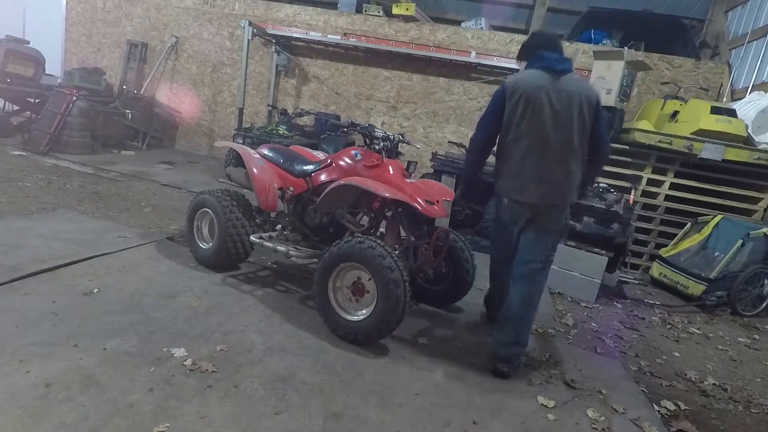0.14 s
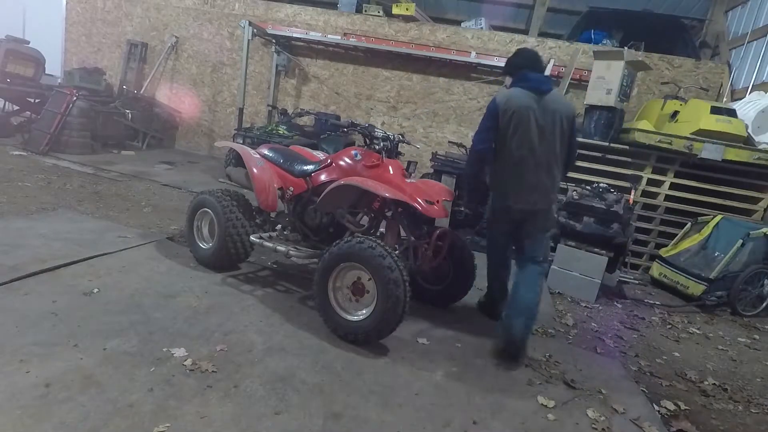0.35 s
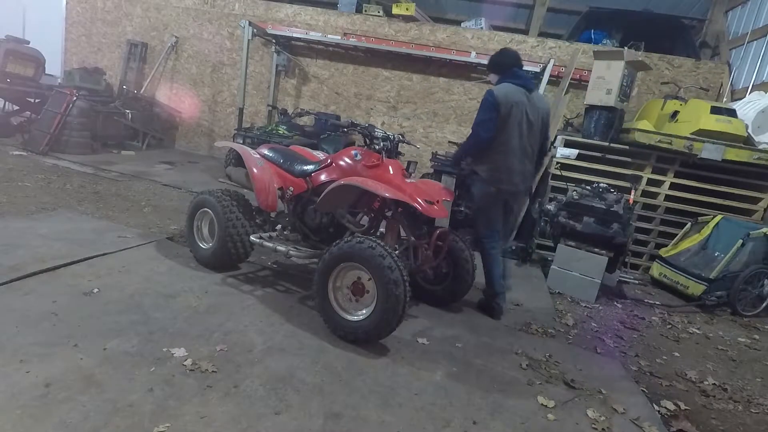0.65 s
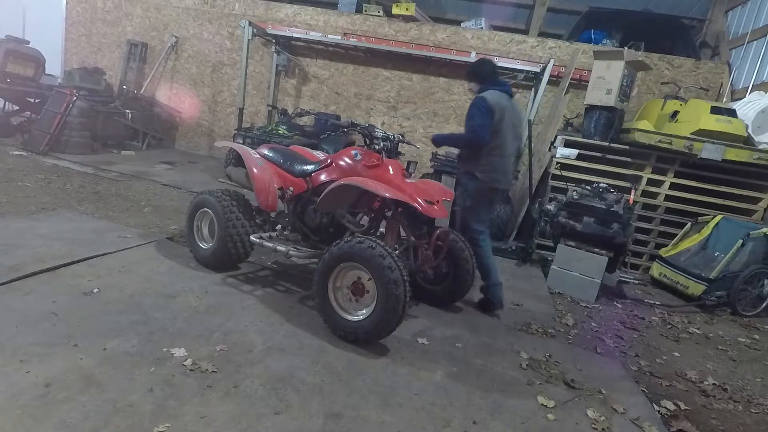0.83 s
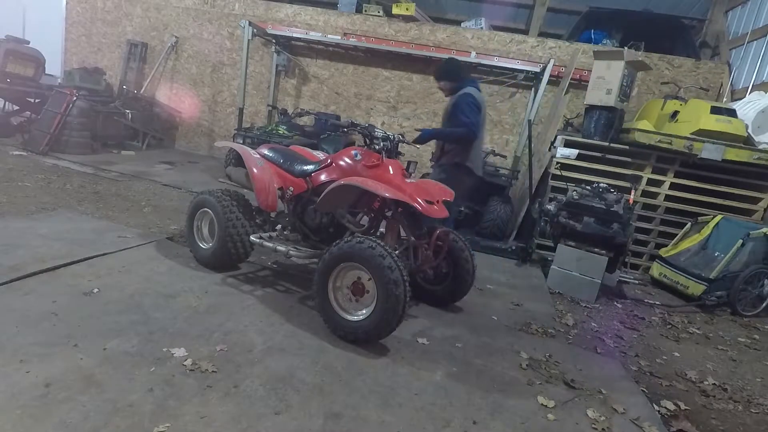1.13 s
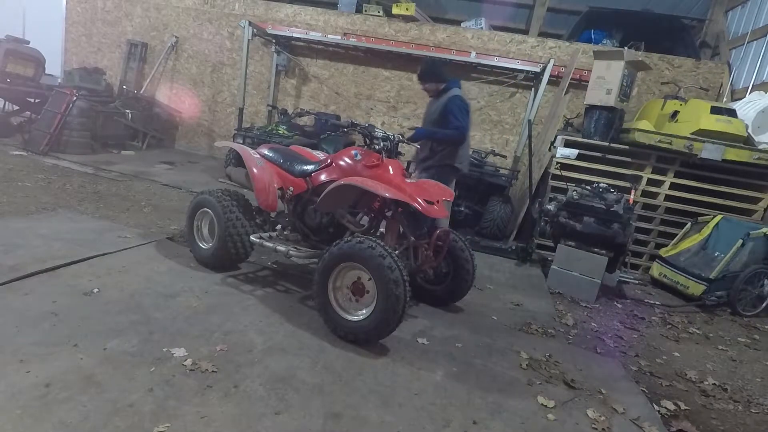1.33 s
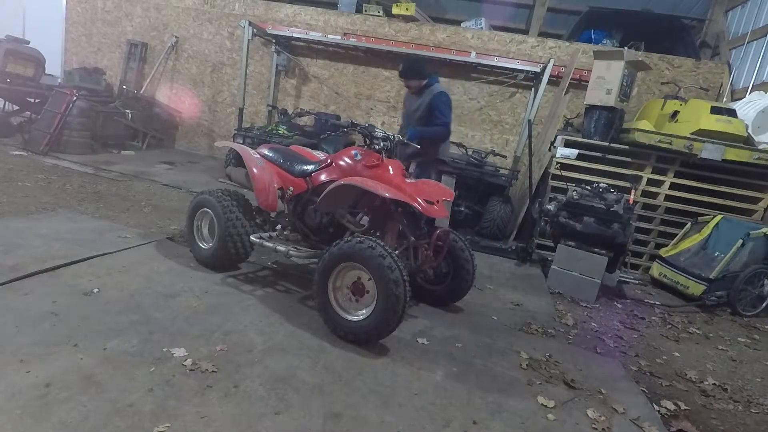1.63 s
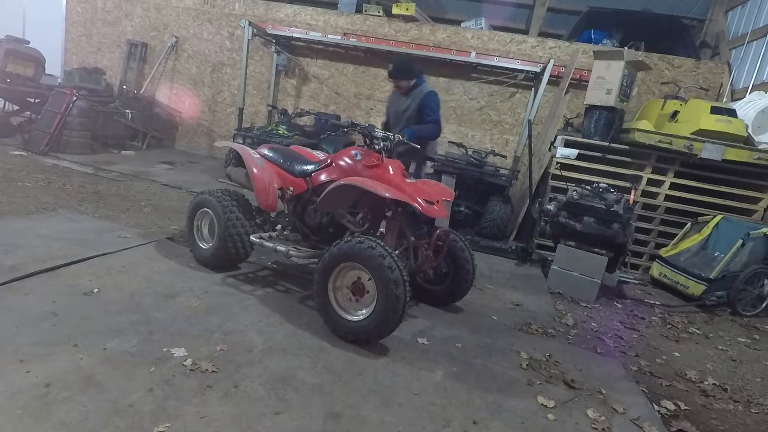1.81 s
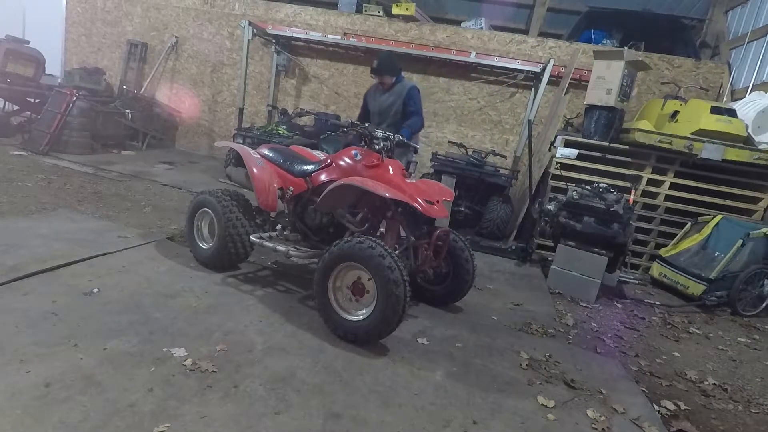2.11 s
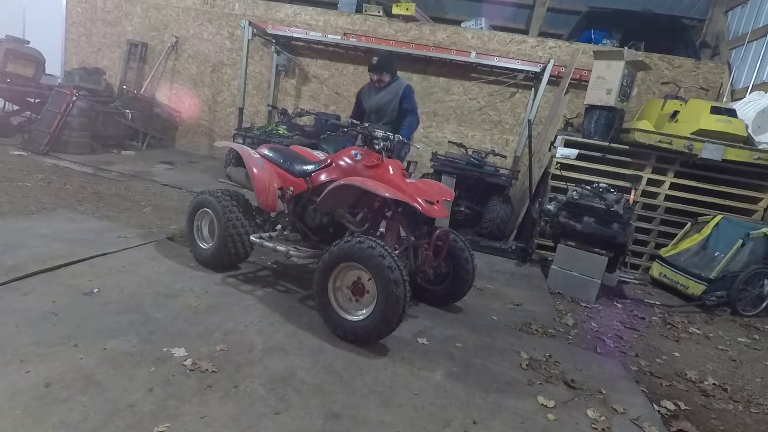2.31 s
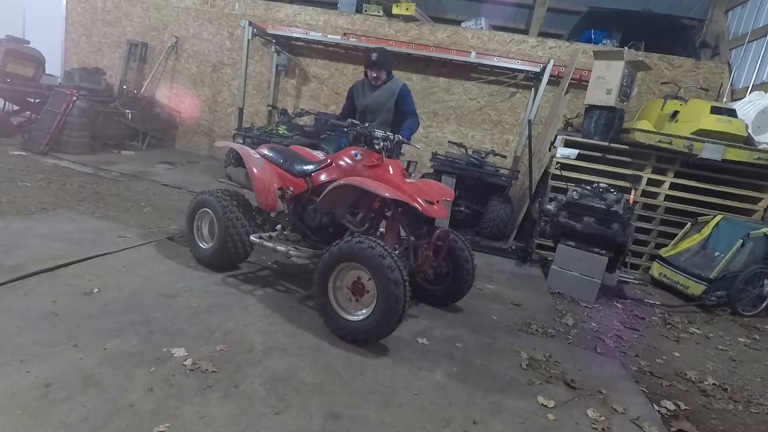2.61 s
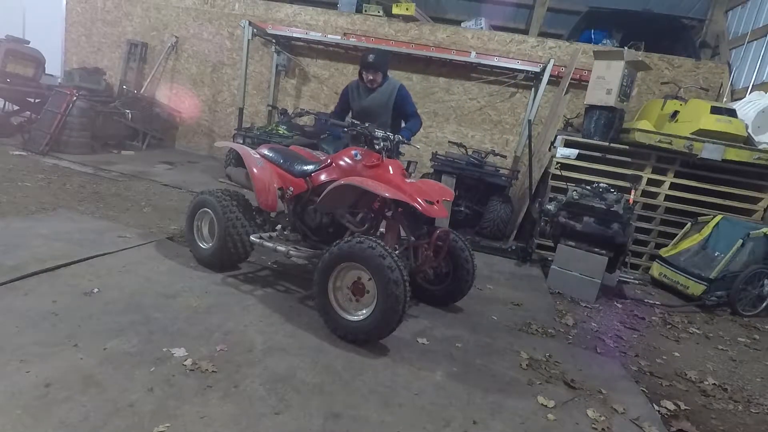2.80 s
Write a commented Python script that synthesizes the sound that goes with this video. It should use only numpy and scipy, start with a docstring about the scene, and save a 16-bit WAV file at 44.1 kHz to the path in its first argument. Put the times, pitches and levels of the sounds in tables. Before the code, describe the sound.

Footsteps: soft rubber boots on gritty concrete in a large echoing shed. Thuds and scuffs at 0.1-0.3 s, with a sharp grit crackle near 0.33; a faint step at 0.55, a firm one at 0.81-0.87, softer ones at 1.25 and 1.77. Light plastic taps at 2.13-2.19, a faint thud at 2.4, then louder hollow knocks at 2.59-2.68, ringing away over faint hiss and rumble.

```python
"""In a large echoing shed, rubber-soled boots cross a concrete workshop floor: soft heel and toe thuds.
The soles scuff and crack grit, made of shaped noise; hands knock the plastic body of a small vehicle,
made of ringing tones. Thuds are short sagging tones with a dull slap of noise. The shed answers with
wall echoes, standing waves and a fading tail. Faint air hiss and low rumble lie underneath."""
import sys
import numpy as np
from scipy import signal
from scipy.fft import rfft, irfft, next_fast_len
from scipy.io import wavfile
from scipy.ndimage import map_coordinates

SR = 44100
rng = np.random.default_rng(int(sys.argv[2]) if len(sys.argv) > 2 else 0)


def gain_from_db(level_db):
    """Convert decibel levels to linear amplitude factors (20 dB per decade)."""
    decades = np.asarray(level_db, float) / 20
    return 10 ** decades


def waveform_to_disk(signal):
    """Save audio, clipped to [-1, 1], as 16-bit WAV at the path in sys.argv[1]."""
    frames = np.transpose(np.atleast_2d(signal))
    scaled = np.clip(frames, -1, 1) * 32767
    samples = np.round(scaled).astype(np.int16)
    wavfile.write(sys.argv[1], SR, samples)


N = 130095  # length in samples


def along(points, hz):
    """Read a curve of (pitch_hz, value) points, with pitch on a log axis."""
    point_hz, value = np.transpose(points)
    return np.interp(np.log(hz + 1), np.log(point_hz + 1), value)


def unit(x):
    """Scale to an rms of 1."""
    return x / np.sqrt(np.mean(x ** 2) + 1e-20)


def coloured(x, gain_db):
    """Make some pitches louder and others softer; gain_db is a function of frequency in Hz."""
    size = next_fast_len(len(x) + 8192)
    gain = gain_from_db(gain_db(np.fft.rfftfreq(size, 1 / SR)))
    return irfft(rfft(x, size) * gain, size)[:len(x)]


def add(out, start_s, x):
    """Mix x into out from start_s on, trimming whatever lies outside."""
    start = round(start_s * SR)
    x = x[max(-start, 0):]
    part = out[max(start, 0):][:len(x)]
    part += x[:len(part)]


# Tone of the air hiss: pitch_hz, relative level_db
AIR_TONE = [(41, -47), (70, 4), (655, -6), (899, -4), (1290, -13), (1480, -7.5), (2030, -16),
            (15500, -22.5)]
# Tone of the low rumble: pitch_hz, relative level_db
RUMBLE_TONE = [(7.1, -61), (12, 9.5), (25, 13), (54, -5.5), (110, -17), (140, 1), (240, -120)]
# Rise and fall of the rumble: time_s, level_db
RUMBLE_LEVEL = [(0.0, -48.5), (0.73, -46.5), (0.77, -52), (0.87, -47), (0.92, -60), (1.08, -47),
                (1.21, -59), (1.27, -46.5), (1.71, -54.5), (1.81, -45), (2.0, -58), (2.05, -48),
                (2.59, -52), (2.64, -40), (2.89, -60), (2.95, -53)]


def background():
    """Steady hiss of the air and a low rumble, both coloured noise; the rumble sways at random."""
    t = np.arange(N) / SR
    air = unit(coloured(rng.standard_normal(N), lambda hz: along(AIR_TONE, hz)))
    sway_db = 1.5 * map_coordinates(rng.standard_normal(40), [t * 8])  # 8 random points a second
    rumble = coloured(rng.standard_normal(N), lambda hz: along(RUMBLE_TONE, hz))
    rumble = unit(gain_from_db(sway_db) * rumble)
    rumble_db = np.interp(t, *np.transpose(RUMBLE_LEVEL))
    return gain_from_db(-57) * air + gain_from_db(rumble_db) * rumble


# How long the shed rings: pitch_hz, time to fall by 60 dB_s
SHED_FADE = [(100, 1.88), (210, 1.13), (500, 1.23), (1500, 1.53), (4000, 1.36), (12000, 0.76)]
# Tone of the shed's tail: pitch_hz, relative level_db
SHED_COLOUR = [(60, 3), (150, 0.5), (210, -17), (300, -7), (600, 1.5), (2000, 3), (12000, 3)]


def tail():
    """A fresh shed tail of energy 1: noise that builds up, then each pitch dies at its own speed."""
    build_s = 0.025
    hz, t, noise = signal.stft(rng.standard_normal(SR * 3 // 4), SR, nperseg=512)
    build = 1 - np.exp(-(t / build_s) ** 2)
    level_db = along(SHED_COLOUR, hz)[:, None] - 60 * t / along(SHED_FADE, hz)[:, None]
    echo = signal.istft(noise * build * gain_from_db(level_db), SR, nperseg=512)[1]
    return echo / np.linalg.norm(echo)


# Echoes from near walls: usual delay_s, level_db before dulling
WALLS = [(.011, -12), (.0235, -4), (.032, -9), (.045, -10), (.06, -10)]
# Standing waves of the shed: pitch_hz, usual level_db, time to fall by 60 dB_s
SHED_MODES = [(129, -55, 0.87), (179.7, -54, 0.64), (213.3, -57, 0.94), (229.4, -56.5, 0.79),
              (325.3, -55.5, 0.39)]


def shed(x, tail_db):
    """Sound in the shed: the direct sound, dull near walls, standing waves and the tail."""
    wall_dull_hz = 2530  # walls return little above this
    t = np.arange(SR * 3 // 4) / SR
    walls = np.zeros(SR // 10)
    for delay_s, db in WALLS:
        walls[round(delay_s * SR * rng.normal(1, 0.04))] += gain_from_db(db)
    walls = coloured(walls, lambda f: -6 * np.log2(1 + (f / wall_dull_hz) ** 2))

    room = gain_from_db(tail_db) * tail()[:len(t)]
    for hz, db, fade_s in SHED_MODES:
        room += gain_from_db(db + rng.normal(0, 1.6) - 60 * t / fade_s) * np.sin(2 * np.pi * hz * t)
    add(room, 0, walls)
    room[0] += 1  # the direct sound
    return signal.fftconvolve(x, room)


SCUFF_TAIL_DB = -9.5  # shed tail behind scuffs and snaps
# Sole scuffs: peak_s, rise_s, fall_s, level_db, brightness_db per octave
SCUFFS = [(.002, 0.028, 0.042, -47, -1), (.15, 0.19, 0.24, -60, 1.5), (.085, 0.045, 0.13, -46, 1),
          (.285, 0.054, 0.079, -46.5, -3), (0.311, 0.013, .02, -41.5, 2.5), (.333, 0.015, 0.021, -35, 5),
          (.558, .01, 0.01, -46.5, -2), (.66, 0.014, .02, -54, -4), (.735, 0.018, 0.11, -57, 1),
          (.845, 0.035, 0.068, -42, -2), (1.2, 0.028, 0.064, -54.5, 5), (1.28, 0.053, 0.12, -50, -3),
          (1.87, 0.058, 0.16, -52, -2.5), (2.15, 0.18, 0.12, -58, -1.5), (2.598, 0.0061, 0.0098, -55, -2),
          (2.642, 0.012, 0.081, -44, -5.5)]
# Tone of rubbed grit: pitch_hz, relative level_db
GRIT_TONE = [(300, -24), (800, -0.5), (2000, 1), (3500, -0.5), (5000, -4), (7000, -2.5), (10000, -4),
             (13000, -8.5), (15500, -15.5)]


def scuffs():
    """The sole drags over grit: hiss and tiny random grains, coming unevenly, under a swell."""
    grains_per_s, grain_spread_db, grain_share = 1500, 3, 0.4
    clumps_per_s, clump_db = 200, 2  # unevenness of the grit
    out = np.zeros(N)
    t = np.arange(-SR // 4, SR // 3) / SR  # 0 at the peak of the swell
    for peak_s, rise_s, fall_s, db, tilt_db in SCUFFS:
        hits = rng.random(len(t)) < grains_per_s / SR
        grain_level = gain_from_db(grain_spread_db * rng.standard_normal(len(t)))
        grains = hits * grain_level * rng.standard_normal(len(t))
        raw = grain_share * unit(grains) + (1 - grain_share) * rng.standard_normal(len(t))
        rub = unit(coloured(raw, lambda hz: along(GRIT_TONE, hz) + tilt_db * np.log2((hz + 100) / 3000)))
        clumps = gain_from_db(clump_db * map_coordinates(rng.standard_normal(200), [(t - t[0]) * clumps_per_s]))
        swell = np.where(t < 0, np.exp(-(t / rise_s) ** 2), np.exp(-t / fall_s * (t > 0)))
        add(out, peak_s + t[0], shed(gain_from_db(db) * rub * clumps * swell, SCUFF_TAIL_DB))
    return out


# Single grit snaps: start_s, peak level_db before the shed answers
SNAPS = [(.0755, -35), (0.326, -20), (.338, -24), (0.8188, -38), (0.869, -30)]


def snaps():
    """One grain of grit cracks under the sole: bright noise that falls by 60 dB in 3 ms."""
    out, t = np.zeros(N), np.arange(SR // 100) / SR
    for start_s, db in SNAPS:
        noise = np.diff(rng.standard_normal(len(t) + 1))  # differences favour the treble
        crack = noise * gain_from_db(-60 * t / 0.003)
        add(out, start_s, shed(gain_from_db(db) * crack / np.abs(crack).max(), SCUFF_TAIL_DB))
    return out


def thump(blow_db):
    """Weight behind a blow: one slow low push at 47 Hz, set 16 dB under the blow's level."""
    t = np.arange(SR // 5) / SR
    return gain_from_db(blow_db - 16) * np.sin(2 * np.pi * 47 * t) * np.exp(-t / 0.017)


# Knocks on the plastic body: start_s, peak level_db of the ring, most favoured pitch_hz,
# favoured range_octaves
KNOCKS = [(2.1295, -32, 1100, 0.37), (2.161, -45, 1010, 0.53), (2.14, -40.5, 125, 0.45),
          (2.148, -43, 353, 0.31), (2.186, -43.5, 1010, 0.75), (2.5905, -43, 1280, 0.35),
          (2.593, -29, 385, 0.58), (2.6335, -25, 850, 0.76), (2.637, -25, 403, 1), (2.651, -20, 233, 1.27),
          (2.678, -29.5, 300, 2)]
# Ringing tones of the plastic: usual pitch_hz, usual relative level_db, time to fall by 60 dB_s
PLASTIC = [(125, -3, 0.056), (187, -0.5, 0.073), (235, 3.5, 0.034), (280, -0.5, 0.074), (348, -5, 0.11),
           (392, 6.5, 0.07), (602, -2, 0.073), (680, 4, 0.042), (869, -4.5, 0.034), (931, -7, 0.041),
           (1100, -3, 0.022), (1345, -7.5, 0.03), (1626, -1, 0.024), (2004, -1.5, 0.039)]


def knocks():
    """Each knock rings the same plastic tones, favouring those of the spot struck, with a noisy crack."""
    crack_db, crack_s = -11, 0.024  # level over the ring; time to fall by 60 dB
    tail_db = -0.5
    out, t = np.zeros(N), np.arange(SR // 4) / SR
    for start_s, db, centre_hz, octaves in KNOCKS:
        ring = np.zeros(len(t))
        for hz, tone_db, fade_s in PLASTIC:
            favour_db = -4.5 * (np.log2(hz / centre_hz) / octaves) ** 2
            level_db = tone_db + favour_db + rng.normal(0, 1) - 60 * t / fade_s
            ring += gain_from_db(level_db) * np.sin(2 * np.pi * hz * rng.normal(1, 0.01) * t)
        ring *= 1 - np.exp(-t / 0.00152)  # soft attack

        def crack_tone_db(f):
            """Noise softened above twice the favoured pitch and below that pitch."""
            treble_db = -9 * np.log2(1 + (f / (2 * centre_hz)) ** 2)
            bass_db = -6 * np.log2(1 + (centre_hz / (f + 1)) ** 2)
            return treble_db + bass_db

        noise = unit(coloured(rng.standard_normal(len(t)), crack_tone_db))
        crack = gain_from_db(crack_db - 60 * t / crack_s) * noise
        add(out, start_s, shed(gain_from_db(db) * (ring / np.abs(ring).max() + crack), tail_db))
        add(out, start_s, thump(db))
    return out


# Heel and toe thuds: start_s, peak level_db of the ring, settled pitch_hz, ring length_cycles
THUDS = [(-.12, -27, 280, 1.1), (0.088, -31.5, 317, 1.55), (.092, -37, 500, 2.3), (.1005, -34, 598, 2.4),
         (0.1956, -24.5, 327, 1.6), (.252, -31, 316, 1), (0.27, -33, 306, 2.4), (0.555, -35.5, 300, 0.96),
         (0.8125, -22.5, 312, 0.82), (.822, -37, 215, 2), (0.838, -31, 206, 2.8),
         (0.8633, -22.5, 235, 2.17), (0.948, -40, 192, 1), (1.228, -31.5, 300, 0.76),
         (1.237, -36, 155, 1.1), (1.257, -31.5, 260, 0.92), (1.279, -33.5, 417, 0.6),
         (1.292, -49.5, 128, 2.6), (1.7606, -27, 278.5, 1.2), (1.783, -30.5, 260, 1.2),
         (1.921, -38.5, 210, 1.9), (2.411, -37, 225, 0.69)]


def thuds():
    """A soft sole lands: a low ring of a few cycles that sags in pitch, and a dull slap on concrete."""
    slap_db, slap_hz, slap_s = -13.5, 1200, 0.024  # level over the ring; dull above; 60 dB fall time
    attack_s, sag_s, tail_db = 0.001, 0.0014, 3.5
    out, t = np.zeros(N), np.arange(SR // 20) / SR
    for start_s, db, hz, cycles in THUDS:
        # cycles so far: the pitch starts about 31 % high and settles
        turns = hz * (t + 0.19 * 0.0023 * (1 - np.exp(-t / sag_s)))
        fade = np.exp(-(turns / cycles) ** 2)
        blow = np.sin(2 * np.pi * turns) * fade * (1 - np.exp(-t / attack_s))
        noise = coloured(rng.standard_normal(len(t)), lambda f: -12 * np.log2(1 + (f / slap_hz) ** 2))
        slap = unit(noise) * gain_from_db(slap_db - 60 * t / slap_s)
        add(out, start_s, shed(gain_from_db(db) * (blow / np.abs(blow).max() + slap), tail_db))
        add(out, start_s, thump(db))
    return out


def scene():
    """All sources added together at the one microphone."""
    return (background() + scuffs() + snaps() + knocks() + thuds())[None]


def top_cut(x):
    """Nothing passes above the cut-off."""
    return signal.sosfilt(signal.butter(12, 15660, fs=SR, output="sos"), x)


def record(dry):
    """The camera's band limit cuts everything above 15350 Hz by 120 dB."""
    mix = coloured(dry[0], lambda hz: -120.0 * (hz > 15350))[None]
    return top_cut(mix)


dry = scene()
out = record(dry)
waveform_to_disk(out)
```